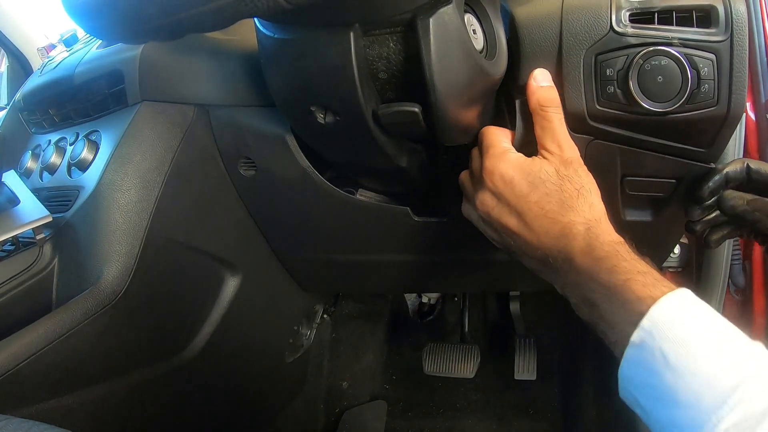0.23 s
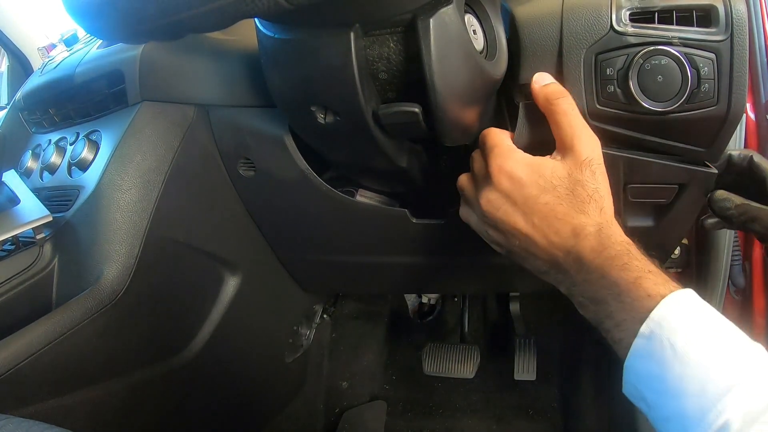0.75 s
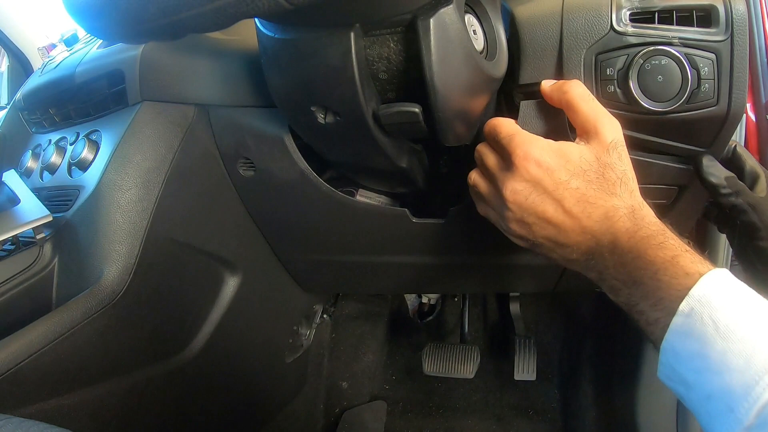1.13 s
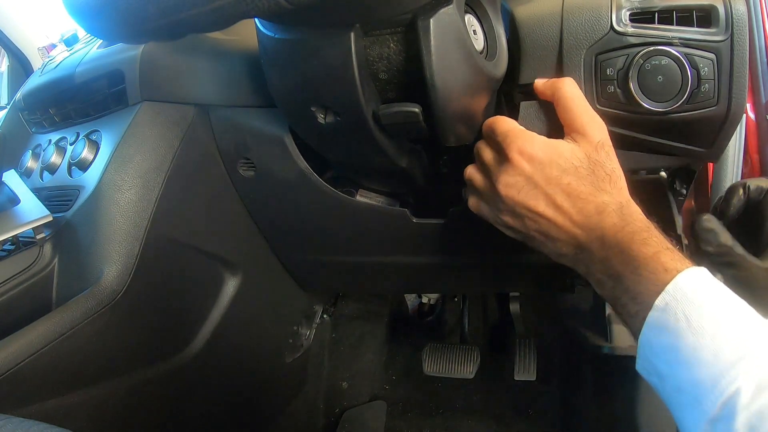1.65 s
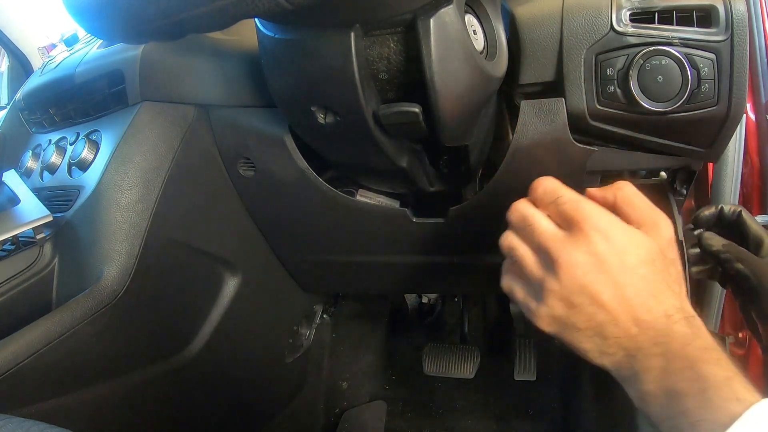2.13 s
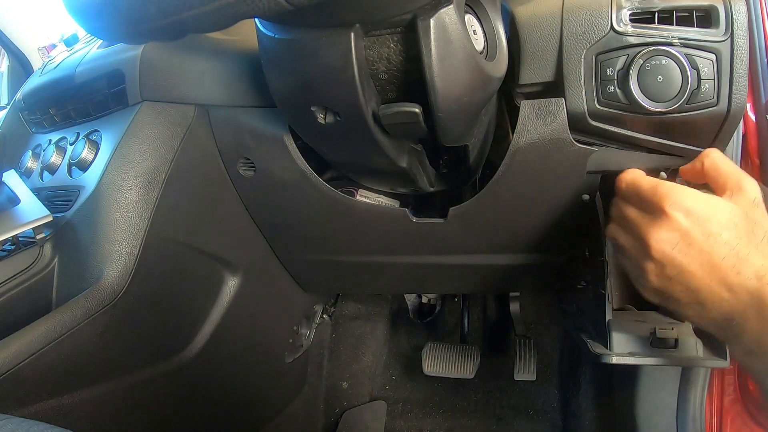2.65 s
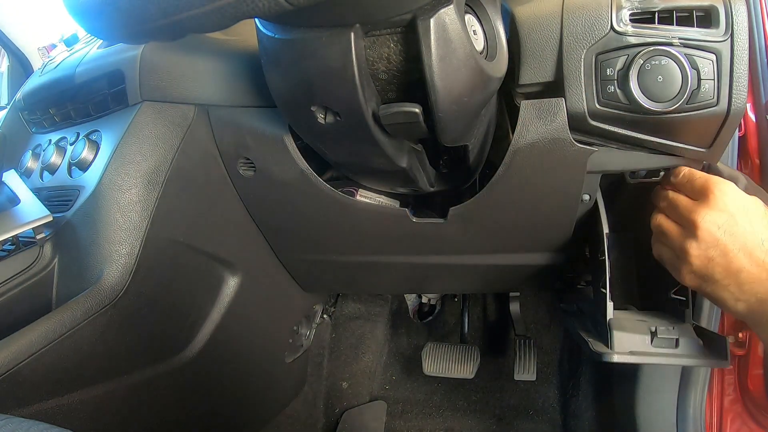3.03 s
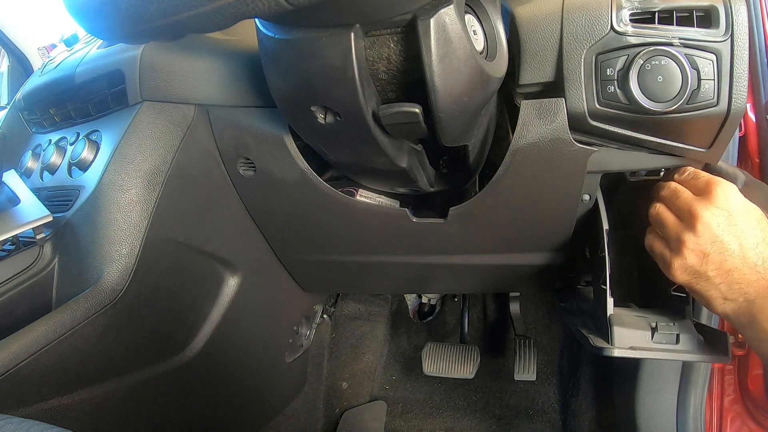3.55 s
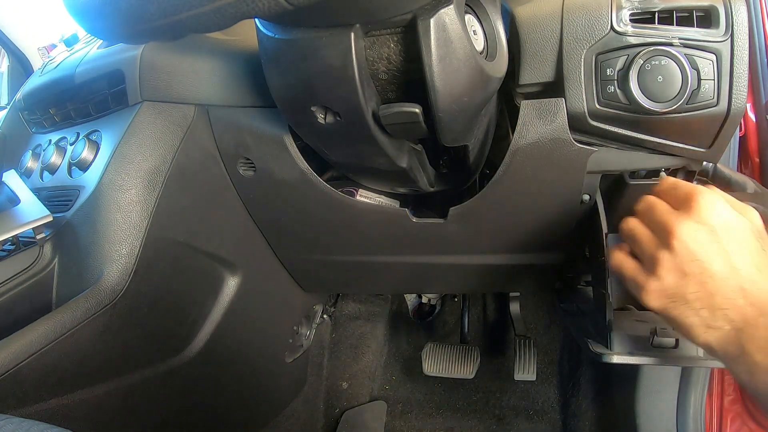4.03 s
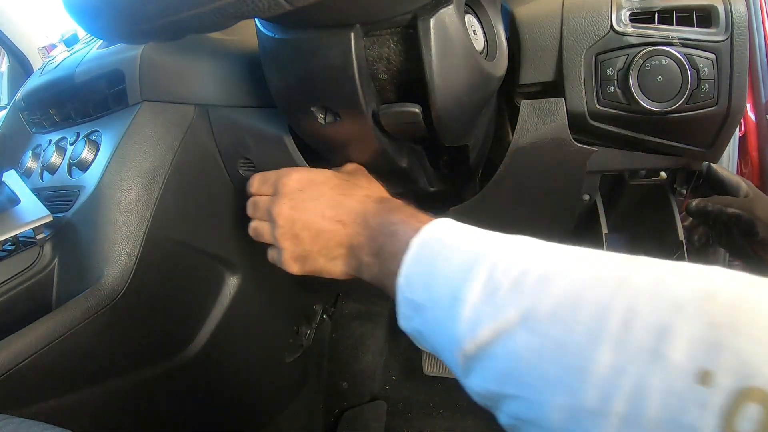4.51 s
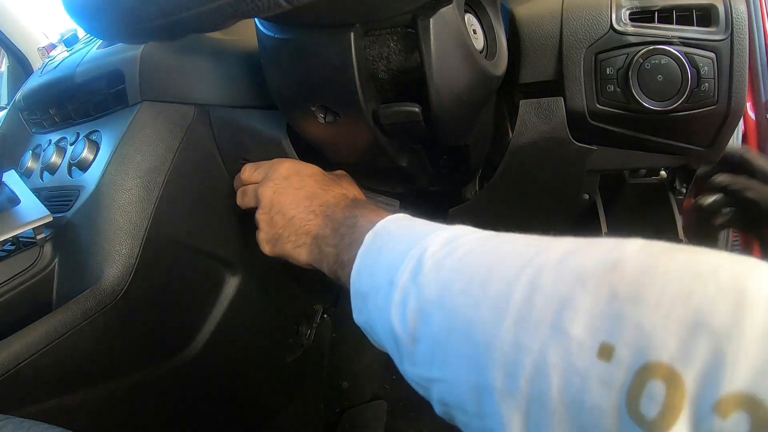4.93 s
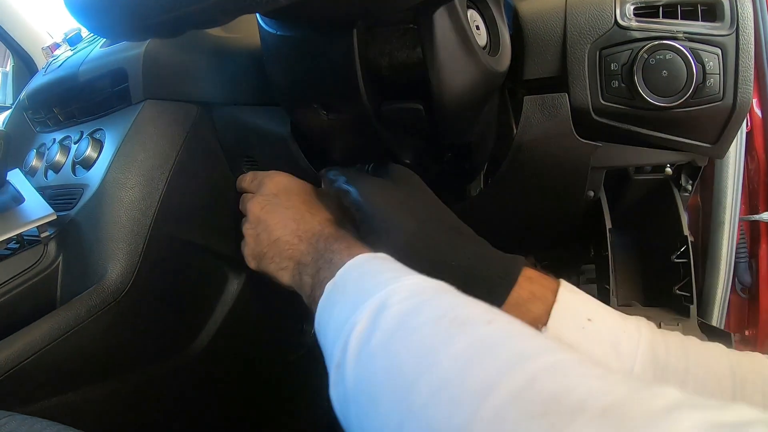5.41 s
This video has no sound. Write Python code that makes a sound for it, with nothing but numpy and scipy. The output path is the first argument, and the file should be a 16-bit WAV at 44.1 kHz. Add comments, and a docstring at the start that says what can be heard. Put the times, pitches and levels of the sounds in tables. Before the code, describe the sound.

Close, loud cracks of plastic clips releasing in bursts, with dashboard thumps, then soft ticks, rubbing and a few last knocks.

```python
"""Pulling a panel off a dashboard

A plastic trim panel is pulled off a car dashboard by hand, close to two microphone ports.
Clips snap and the loose panel knocks: short bursts of random slips ring clip, panel and dashboard.
Each blow leaves a rattle and a shaking dashboard: noise that jumps up and dies away.
Fingers and sleeve rub the plastic (grainy noise) over the quiet hum of the cabin (steady noise)."""
import sys
import numpy as np
from scipy import signal
from scipy.fft import rfft, irfft, next_fast_len
from scipy.io import wavfile
from scipy.ndimage import map_coordinates

SR = 44100
rng = np.random.default_rng(int(sys.argv[2]) if len(sys.argv) > 2 else 0)


def waveform_to_disk(signal):
    """Save audio, clipped to [-1, 1], as 16-bit WAV at the path in sys.argv[1]."""
    frames = np.transpose(np.atleast_2d(signal))
    scaled = np.clip(frames, -1, 1) * 32767
    samples = np.round(scaled).astype(np.int16)
    wavfile.write(sys.argv[1], SR, samples)


N = 250047  # length in samples

# colour of the cabin hum: (frequency [Hz], relative level [dB per Hz])
HUM_COLOUR = [(12, -19.5), (20, -2), (59, -6.5), (126, 1.5), (196, 2.5), (352, -6.5), (404, -14),
              (549, -10), (788, -1.5), (1100, -11.5), (1820, -9.5), (2470, -29.5), (3170, -28.5),
              (7730, -30), (15500, -60.5)]
# fuzzy far machine tones: (frequency [Hz], width [Hz], level [dB])
MACHINE_TONES = [(50.4, 13, -72), (186.7, 19, -64)]
# how alike left and right are in the hum: (frequency [Hz], likeness [-1 to 1])
HUM_ALIKE = [(25, 0.8), (60, 0.2), (180, 0.89), (550, 0.17), (1650, -0.1), (4970, -0.7), (15000, -1.1)]
# hand on the plastic: (time [s], rubbing level [dB], level of the low shaking [dB])
HAND_MOVES = [(0.0, -60.5, -47), (0.18, -62, -61), (0.3, -63.5, -64), (0.42, -65, -47), (0.56, -58.5, -55),
              (0.7, -67, -71), (0.96, -67, -52.5), (1.22, -61, -54.5), (1.5, -54, -49), (1.75, -57.5, -55),
              (1.88, -57, -58), (1.94, -67, -57), (2.0, -63, -49), (2.16, -61, -54), (2.401, -67.5, -58.5),
              (2.84, -65.5, -62), (3.2, -66.5, -60), (3.49, -67.5, -64), (3.96, -69, -64.5),
              (4.44, -71, -69.5), (4.55, -56.5, -76.5), (4.67, -59.5, -71), (4.8, -59, -49),
              (4.9, -71, -76), (4.965, -65.5, -70), (5.04, -52, -49.5), (5.139, -64, -63.5),
              (5.27, -66, -101), (5.48, -65, -88), (5.568, -56, -54), (5.67, -62, -46)]
# the deepest rumble, before its waver: (time [s], level [dB])
ROCKING_LEVEL = [(0.0, -59), (0.06, -41), (0.28, -64), (0.44, -54), (0.47, -19), (0.52, -23), (0.63, -37.5),
                 (1.17, -65), (1.44, -63.5), (1.56, -29), (1.75, -53.5), (1.85, -39), (2.3, -63.5),
                 (3.02, -71), (3.05, -56), (4.59, -67.5), (4.83, -48), (4.93, -64.5), (5.04, -38),
                 (5.35, -73), (5.59, -52), (5.67, -58)]
# colours of rubbing, skin hiss and panel drone: (frequency [Hz], relative level [dB per Hz])
SCRAPE_COLOUR = [(530, -49.5), (900, -9), (1040, -22.5), (1420, 2.5), (1640, -3.5), (1770, -1.5),
                 (5500, -11), (7150, -77), (12100, -120)]
HISS_COLOUR = [(2350, -25), (4000, -21.5), (5050, -25), (5780, -2.5), (8310, -6), (9790, -15.5),
               (12900, -28.5), (15500, -42)]
DRONE_COLOUR = [(150, -62), (250, -6.5), (351, -9.5), (420, -1.5), (686, -10.5), (764, -9), (1400, -12),
                (1820, -43.5), (3080, -120)]
# short strokes that make the panel sing, level before the stutter:
# (start [s], length [s], share spent swelling [0 to 1], level [dB], ring [Hz], width [Hz])
FINGER_STROKES = [(0.36, 0.11, .4, -43, 130, 54), (0.345, 0.08, .2, -49.5, 1340, 2597),
                  (1.5, .07, .3, -57, 2000, 1600), (1.786, 0.15, .2, -42.5, 580, 660),
                  (1.789, 0.11, 0.19, -48, 2650, 2224), (3.56, 0.12, .3, -61.5, 1800, 3600),
                  (4.5, 0.244, .4, -65, 6700, 5700), (4.482, 0.15, .25, -50.5, 495, 45),
                  (4.482, 0.13, .2, -59.5, 830, 60), (4.53, .15, 0.48, -56.5, 2150, 2900),
                  (4.74, 0.15, 0.33, -53, 460, 320), (4.755, 0.13, .35, -50.5, 1230, 2700),
                  (4.76, 0.12, .3, -58, 7700, 3500), (4.714, 0.173, 0.35, -39, 94, 65),
                  (4.91, 0.095, 0.9, -57, 1500, 2300)]
# snaps and knocks, peak levels before panning and microphone:
# (time [s], crack peak [dB], hollow knock peak [dB], dashboard thump peak [dB], sharp edge peak [dB],
#  panel ring [Hz], left over right [dB], clip ring [Hz], dashboard ring [Hz])
BLOWS = [(0.0070, -37.5, -44, -44, -46, 795, 9.5, 2830, 89),
         (0.0361, -46, -35, -42, -68, 617, -3, 2780, 94),
         (0.053, -30, -21, -19, -41.5, 1000, -1, 1710, 110),
         (0.085, -44, -40, -40, -52, 500, -3, 4200, 100), (0.048, -19, -9.5, -19, -36, 640, -4, 1950, 119),
         (0.147, -52, -43.5, -41.5, -63, 440, -2, 2810, 87),
         (0.3297, -43.5, -50.5, -61, -49, 1340, -7, 2440, 78),
         (0.3373, -46, -52, -60, -50, 900, -5, 3000, 105.3),
         (0.3497, -42, -43.5, -48.5, -51.5, 600, -5, 3000, 105),
         (0.358, -42, -48, -55, -50, 1140, 4, 2800, 119), (0.4158, -46, -39, -41, -50, 557, -5, 2160, 123),
         (0.447, -62, -42, -39.5, -75, 700, -5, 1700, 200),
         (0.4630, -15, -16.5, -10, -15.5, 550, -5, 2670, 131),
         (0.4675, -12.5, -15.5, -10.5, -22, 860, -4, 4500, 231),
         (0.472, -16, -20, -20, -26, 870, -1, 2100, 125),
         (0.4774, -34, -22.5, -16.5, -40, 780, -3, 3480, 230),
         (0.4865, -36, -32, -20, -40, 485, -1, 3000, 110), (0.511, -55, -48, -20.5, -65, 450, -1, 1800, 71),
         (0.596, -32.5, -25.5, -24.5, -60, 624, -4.5, 1770, 133.9),
         (0.7547, -45.5, -37.5, -32.5, -76, 620, -4.5, 1830, 118),
         (1.1883, -38.5, -51, -44, -52.5, 424, -2, 3540, 192),
         (1.335, -48, -52, -55, -54, 600, -6, 1900, 170),
         (1.422, -43.5, -54, -55, -54, 600, -10, 2500, 170),
         (1.389, -43.5, -51, -59, -48, 755, -7, 1770, 173),
         (1.4836, -42, -57, -35.5, -58, 495, -6, 2750, 106),
         (1.5311, -16, -16, -22, -10.5, 1370, -5.5, 3090, 232),
         (1.5331, -12.5, -15.5, -12.5, -15, 1330, -5.5, 2200, 103),
         (1.537, -27, -23, -21, -24, 500, -3, 2450, 200), (1.593, -39.5, -43, -39, -56, 550, -4, 2100, 75),
         (1.628, -45, -44, -54, -62, 554, -16, 1710, 72),
         (1.716, -32, -18, -33.5, -50, 790, -4.5, 1660, 135),
         (1.7471, -32, -23, -30, -63, 860, -5.5, 1500, 190),
         (1.788, -20.5, -30, -25, -18.5, 460, -6.5, 1990, 260),
         (1.792, -19.5, -13.5, -23, -44, 674, -5.5, 2680, 126),
         (1.8098, -48, -33, -22, -42, 920, 2, 3330, 105),
         (1.8255, -23.5, -17, -23, -40.5, 660, -5.5, 1470, 113),
         (1.8453, -30.5, -30, -35, -36, 503, -11, 3900, 107),
         (1.8712, -26.5, -28, -30, -30.5, 600, -6, 1600, 117),
         (1.8751, -29, -21, -26, -40, 676, -6.5, 2860, 116),
         (1.911, -37.5, -29, -32, -68, 554, -6, 1744, 92),
         (2.084, -50.5, -36.5, -27, -57, 689, -11, 2630, 166),
         (2.535, -54, -45, -50, -59, 780, -2, 2446, 320),
         (2.5408, -47.5, -39.5, -46, -59, 546, -12, 2440, 154),
         (2.5442, -43.5, -36, -41.5, -59.5, 732, -4.5, 2200, 85),
         (2.7462, -53, -43, -55, -71.5, 658, -5.5, 1610, 190),
         (2.7985, -58.5, -57, -47.5, -58, 462, -15.5, 1610, 246),
         (2.8708, -52.5, -50.5, -72.5, -50, 827, -9, 2940, 172),
         (3.0004, -51, -46, -39.5, -56, 420, -7, 1655, 178),
         (3.0246, -29, -31, -33.5, -47.5, 503, -5.5, 2700, 169),
         (3.1679, -47, -47, -46, -56.5, 506, -6.5, 1910, 164.5),
         (3.243, -52.5, -45, -69, -71.5, 770, -4.5, 1750, 169),
         (3.3142, -39, -39.5, -64.5, -56.5, 734, -5.5, 2300, 169),
         (3.537, -51.5, -53, -61, -67.5, 1300, -4.5, 2125, 223),
         (3.5901, -49.5, -56, -50, -52, 466, -11.5, 2870, 101),
         (3.748, -57.5, -73, -60.5, -52.5, 1380, -5, 1760, 163),
         (3.951, -37.5, -34, -43, -58, 785, -4, 1790, 155),
         (4.003, -39.5, -37.5, -35, -49, 490, -7.5, 1980, 179),
         (4.086, -52, -68, -51.5, -59, 402, -7, 4440, 93),
         (4.4765, -46.5, -32, -47.5, -60, 480, -0.5, 1767, 260),
         (4.516, -62, -41.5, -59, -70, 490, 0.5, 1765, 200), (4.544, -60, -43, -60, -69, 470, 0, 1765, 200),
         (4.563, -50, -52, -60, -62, 480, 1, 1800, 200), (4.588, -47, -51, -61, -62, 480, -1, 1950, 200),
         (4.688, -37, -33.5, -39, -49, 606, 4.5, 1420, 144),
         (4.7515, -56, -47, -46, -58, 600, -3, 1700, 110),
         (4.7696, -50, -52, -38.5, -38.5, 584, -3, 4030, 73),
         (4.793, -46, -42, -36.5, -62, 440, -16, 1950, 113),
         (4.8221, -42.5, -53, -39.5, -43.5, 420, -12, 2550, 73),
         (4.9686, -37.5, -45.5, -49.5, -39, 690, 12, 2860, 206.6),
         (4.997, -24, -30, -18.5, -35, 595, 3.5, 3380, 183), (5.012, -44, -42, -26, -48, 500, 4, 2800, 200),
         (5.037, -44, -50.5, -31, -44, 404, 12, 2780, 85),
         (5.225, -51.5, -55.5, -58, -68.5, 726, 8.5, 2930, 73),
         (5.519, -50.5, -52, -29.5, -65, 417, -5, 1890, 199),
         (5.5259, -30, -35, -29.5, -44.5, 600, -4, 1540, 149),
         (5.545, -43, -48, -30, -48, 504, -5, 1900, 130),
         (5.5932, -24, -26, -29, -31.5, 614, -5.5, 1710, 184),
         (5.6118, -37.5, -27.5, -33, -63, 510, -5, 1650, 108),
         (5.647, -41.5, -46, -49, -62, 514, -2, 1680, 73)]
# rings of clip, clip tip, panel, dashboard skin and dashboard on its mounts:
# (frequency [Hz], width [Hz], relative level [dB])
CLIP_MODES = [(1630, 370, -1.5), (2210, 300, 0.5), (2750, 540, 1.5), (3420, 500, 0.5), (3900, 320, -1.5),
              (4640, 750, -7.5)]
EDGE_MODES = [(5900, 1500, -0.5), (7480, 1400, 0.5), (8780, 3400, -8.5), (11300, 1500, -24)]
PANEL_MODES = [(400, 120, -3), (567, 160, 0), (721, 190, 0.5), (926, 190, 1), (1070, 150, -0.5),
               (1333, 150, 2.5)]
DASH_MODES = [(73, 6.3, -5), (100.5, 20, -1), (129.7, 25, 0.5), (180, 44, -1.5), (231, 40, 0),
              (330, 90, -6.5)]
FRAME_MODES = [(36, 12, -4), (49, 8.4, 0.5), (70.47, 10, 0)]
# how far the left port leads: (frequency [Hz], phase lead [rad])
PORT_LEAD = [(600, -.1), (1120, .4), (2150, 0), (4300, -.3), (5400, -.9), (7700, -1.4), (10600, -1.6)]
# how much of the left-right setting is heard: (frequency [Hz], share [1 = all])
PORT_SHADE = [(60, .15), (250, .25), (600, .9), (1200, 1.6), (2500, 1.1), (5000, .15), (10000, 0)]
# how long the cabin answers: (frequency [Hz], time to fall 60 dB [s])
CABIN_T60 = [(100, 0.15), (500, 0.13), (3000, 0.072), (12000, 0.033)]
# how alike left and right are in that answer: (frequency [Hz], likeness [0 to 1])
ANSWER_ALIKE = [(300, 0.81), (1000, 0.24), (4000, 0.2)]
# gain of the microphone housing: (frequency [Hz], gain [dB])
MIC_TONE = [(20, -2), (8000, 3.5), (10000, 0), (12000, -7), (15500, -15.5)]

HUM_DB = -66  # middle of the slowly wavering level
# strokes and rubbing: (frequency [Hz], likeness of left and right [0 to 1])
STROKE_ALIKE = [(100, 0.95), (1000, 0.7), (8000, 0.11)]
RUB_ALIKE = [(100, 0.99), (1000, 0.46), (10000, 0.24)]
HISS_DB, HISS_GROWS = -68, 1.14  # level at a rubbing level of -60 dB; dB per dB of rubbing
DRONE_DB, DRONE_GROWS = -58, 1.13  # likewise, at a low shaking of -60 dB
DRONE_SHAKES = 0.22  # dB of drone per dB of low shaking
CREAKS_PER_S, CREAK_SPREAD_DB = 770, 4  # how often the strained clips slip, and how unevenly
CREAK_DB, CREAK_GROWS = -7.5, 0.8  # over rubbing of -59 dB; extra dB per dB of rubbing
RATTLE_DB, RATTLE_T60_S = -40, 0.32  # start against the crack; time to fall 60 dB
SHAKE_DB, SHAKE_T60_S = -27, 0.49  # start against the thump; time to fall 60 dB
SNAP, BLOW, SHOVE = 15, 10.8, 0.25  # clean first contact on clip, panel, dashboard, against the slips
CHATTER_T60_S = 0.035  # the main slips of one release fall 60 dB
BOOM_DB, BOOM_GROWS = -46, 0.6  # peak under a thump of -30 dB; dB per dB of thump
TOP_HZ = 15800  # nothing is kept above


def amp(db):
    """Turn decibels into a plain gain."""
    return 10 ** (np.asarray(db) / 20)


def unit(x):
    """Scale a sound to an average (rms) level of 1."""
    return x / np.sqrt(np.mean(x ** 2) + 1e-20)


def peak(x, db):
    """Scale a sound so its highest peak has the given level."""
    return amp(db) * x / np.abs(x).max()


def along(points, hz):
    """Read a curve of (frequency, value) points, spaced as the ear hears pitch."""
    f, v = np.transpose(points)
    return np.interp(np.log(hz + 1), np.log(f + 1), v)


def over_time(points):
    """Read a curve of (time, value) points at every sample."""
    return np.interp(np.arange(N) / SR, *np.transpose(points))


def wobble(rate):
    """Draw a smooth random curve through `rate` random points a second."""
    knots = rng.standard_normal(int(N * rate / SR) + 4)
    return map_coordinates(knots, [np.arange(N) * rate / SR])


def filtered(x, response):
    """Shape each frequency's strength and timing with a response."""
    m = next_fast_len(x.shape[-1] + 8192)  # spare room for the ringing
    spectrum = rfft(x, m) * response(np.fft.rfftfreq(m, 1 / SR))
    return irfft(spectrum, m)[..., :x.shape[-1]]


def body(modes):
    """An object rings at several frequencies; a wider ring dies sooner."""
    def ring(f, c, w, db):
        return amp(db) * 1j * f * w / (c * c - f * f + 1j * f * w)
    # signs alternate from one ring to the next
    return lambda f: sum((-1) ** k * ring(f, *mode) for k, mode in enumerate(modes))


def struck(modes, hz, db, sharp):
    """Each contact point stirs the rings in new strengths and favours sound near one frequency."""
    modes = [(c, w, level + rng.normal(0, 1.51)) for c, w, level in modes]
    return lambda f: body(modes)(f) * (1 + body([(hz, hz / sharp, db)])(f))


def rush(response, alike):
    """Make coloured stereo noise of level 1; a shared and an opposed part set the likeness."""
    def split(hz):
        turn = np.arccos(np.clip(along(alike, hz), -1, 1)) / 2
        return response(hz) * [np.cos(turn), np.sin(turn)]
    mid, side = filtered(rng.standard_normal((2, N)), split)
    return unit(np.array([mid + side, mid - side]))


def ports(pan_db):
    """A near source differs at the ports in loudness and phase, half on each side."""
    side = np.array([[.5], [-.5]])
    return lambda f: amp(side * pan_db * along(PORT_SHADE, f)) * np.exp(1j * side * along(PORT_LEAD, f))


def cabin(x):
    """Seats and glass answer after a moment; each frequency dies at its own speed."""
    hz, t, z = signal.stft(rng.standard_normal((2, SR // 5)), SR, nperseg=256)
    alike = np.clip(along(ANSWER_ALIKE, hz), 0, 1)[:, None]
    z[1] = alike * z[0] + np.sqrt(1 - alike ** 2) * z[1]
    fade = amp(-60 * t / along(CABIN_T60, hz)[:, None])
    tail = signal.istft(z * fade, SR, nperseg=256)[1]
    tail = tail / np.linalg.norm(tail[0])
    delayed = np.pad(x, (150, 0))[None]  # 150 samples, about 3 ms
    return signal.fftconvolve(delayed, tail, axes=1)[:, :len(x)]


def lingering(column, db, t60):
    """A loudness that jumps with each blow and dies away."""
    rows, jumps = np.array(BLOWS), np.zeros(N)
    jumps[np.round(rows[:, 0] * SR).astype(int)] = amp(rows[:, column] + db)
    return signal.lfilter([1], [1, -amp(-60 / (t60 * SR))], jumps)


def hum():
    """Far traffic, machines, air and microphone hiss blend into steady noise with fuzzy tones."""
    tones = 0
    for hz, width, db in MACHINE_TONES:
        tones = tones + amp(db) * rush(lambda f: body([(hz, width, 0)])(f) ** 2, HUM_ALIKE)
    return tones + amp(HUM_DB + 1.9 * wobble(2.7)) * rush(lambda f: amp(along(HUM_COLOUR, f)), HUM_ALIKE)


def shaking(low_db):
    """Grip and blows shake the dashboard skin (lumpy noise); the whole frame rocks deeper below."""
    level = amp(low_db) + lingering(column=3, db=SHAKE_DB, t60=SHAKE_T60_S)
    skin = amp(3 * wobble(38)) * rush(lambda f: body(DASH_MODES)(f) ** 2, [(100, 0.96)])
    frame = amp(2.5 * wobble(12)) * rush(lambda f: body(FRAME_MODES)(f) ** 2, [(50, 0.94)])
    return level * unit(skin) + amp(over_time(ROCKING_LEVEL)) * unit(frame)


def creaks(rub_db):
    slips = (rng.random(N) < CREAKS_PER_S / SR) * amp(CREAK_SPREAD_DB * rng.standard_normal(N))
    level_db = CREAK_DB + rub_db + CREAK_GROWS * (rub_db + 59)
    return amp(level_db) * unit(filtered(slips, lambda f: body(CLIP_MODES)(f) * ports(-6)(f)))


def hand():
    """Rubbing sticks and slips: grainy noise in three colours, with creaks and low shaking."""
    s, rubbing, low = np.transpose(HAND_MOVES)
    rub_db, low_db = [over_time(np.transpose([s, level])) for level in (rubbing, low)]
    # the panel rattles on after each crack
    rub = amp(rub_db) + lingering(column=1, db=RATTLE_DB, t60=RATTLE_T60_S)
    rub_ratio = rub / amp(-60)
    grain = 2.2 * wobble(90) + 0.31 * wobble(440)  # dB

    scrape = rub * unit(amp(grain) * rush(lambda f: amp(along(SCRAPE_COLOUR, f)), RUB_ALIKE))
    hiss = unit(amp(1.1 * grain) * rush(lambda f: amp(along(HISS_COLOUR, f)), RUB_ALIKE))
    hiss = amp(HISS_DB) * rub_ratio ** HISS_GROWS * hiss
    drone = unit(amp(0.79 * wobble(40)) * rush(lambda f: amp(along(DRONE_COLOUR, f)), RUB_ALIKE))
    drone = amp(DRONE_DB + DRONE_SHAKES * (low_db + 60)) * rub_ratio ** DRONE_GROWS * drone

    to_the_right = amp([[-1.2], [1.2]])
    return to_the_right * (scrape + drone) + hiss + creaks(rub_db) + shaking(low_db)


def strokes():
    """Each stroke is ringing noise that swells, stutters in grains and fades as the finger lifts."""
    out, t = np.zeros((2, N)), np.arange(N) / SR
    for s, length, rise, db, hz, width in FINGER_STROKES:
        progress = np.clip((t - s) / length, 0, 1)
        rise = np.clip(rise, .05, .95)
        ramp = np.minimum(progress / rise, (1 - progress) / (1 - rise))
        swell = np.sin(np.pi / 2 * ramp) ** 1.5
        stutter_db = 2.6 * wobble(60) + 3 * wobble(260)
        singing = rush(lambda f: body([(hz, width, 0)])(f) ** 2, STROKE_ALIKE)
        out += amp(db + stutter_db) * swell * singing
    return out


def hits():
    """Each release is a short chatter of slips that rings clip, panel and dashboard."""
    out, t = np.zeros((2, N + SR)), np.arange(SR // 2) / SR

    def dull(f, hz):
        """Plastic damps what lies above its rings."""
        return 1 / (1 + 1j * f / hz) ** 2

    def push(rise):
        """One shove that peaks after `rise` seconds; heavier parts take it more slowly."""
        return (t / rise) * np.exp(-t / rise)

    for s, crack_db, knock_db, thump_db, edge_db, knock_hz, pan_db, crack_hz, thump_hz in BLOWS:
        slips = rng.standard_normal((5, len(t))) * amp(6.72 * rng.standard_normal(len(t)))
        fall = amp(-60 * t / CHATTER_T60_S)
        fall = fall + amp(-26.5 - 60 * t / 0.1)  # a loose rattle trails the snap
        fall = fall + 1.3 * amp(-60 * t / 0.0059)  # the first slips are the hardest
        chatter = slips * fall * (1 - np.exp(-t / 0.00038))

        clip = struck(CLIP_MODES, crack_hz, db=7, sharp=4)
        panel = struck(PANEL_MODES, knock_hz, db=14, sharp=4.5)
        dash = struck(DASH_MODES, thump_hz, db=8, sharp=3.7)
        punch = body([(thump_hz, .8 * thump_hz, 5)])

        crack = filtered(chatter[0] + SNAP * push(0.00004), lambda f: clip(f) * dull(f, 14000))
        knocking = chatter[1] * amp(-60 * t / 0.05) + BLOW * push(0.00016)
        knock = filtered(knocking, lambda f: panel(f) * dull(f, 1800))
        edge = filtered(chatter[2] * amp(-60 * t / 0.13), body(EDGE_MODES))
        # the skin keeps shuddering after the blow
        shudder = SHOVE * push(0.00091) + slips[3] * (0.4 * push(0.002) + 0.09 * push(.016))
        thump = filtered(shudder, lambda f: (dash(f) + punch(f)) * dull(f, 330))
        boom = filtered(slips[4] * push(0.014), lambda f: body(FRAME_MODES)(f) * dull(f, 150))

        near = peak(crack, crack_db) + peak(knock, knock_db) + peak(edge, edge_db)
        boom_db = BOOM_DB + BOOM_GROWS * (thump_db + 30)
        low = peak(thump, thump_db) + peak(boom, boom_db)
        heard = filtered(near + low, ports(pan_db)) + amp(-11) * cabin(near)
        out[:, round(s * SR):][:, :len(t)] += heard
    return out[:, :N]


def scene():
    """All sources meet at the ports; blows and strokes lose top treble in the microphone housing."""
    near = filtered(strokes() + hits(), lambda f: amp(along(MIC_TONE, f)))
    return hum() + hand() + near


def record(dry):
    """A gentle limit keeps the highest peaks just below full level; the top frequencies are cut."""
    limited = dry / (1 + np.abs(dry / .95) ** 6) ** (1 / 6)
    return filtered(limited, lambda hz: hz < TOP_HZ)


dry = scene()
out = record(dry)
waveform_to_disk(out)
```